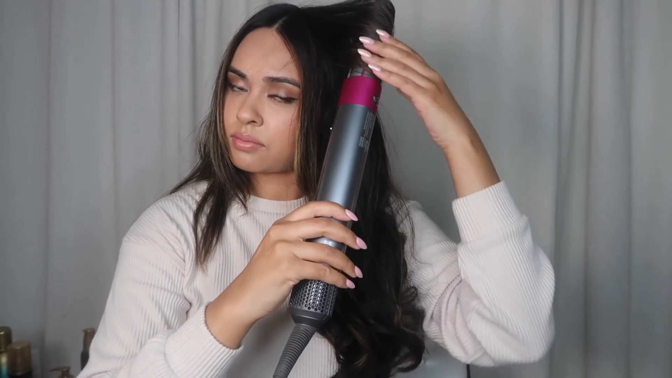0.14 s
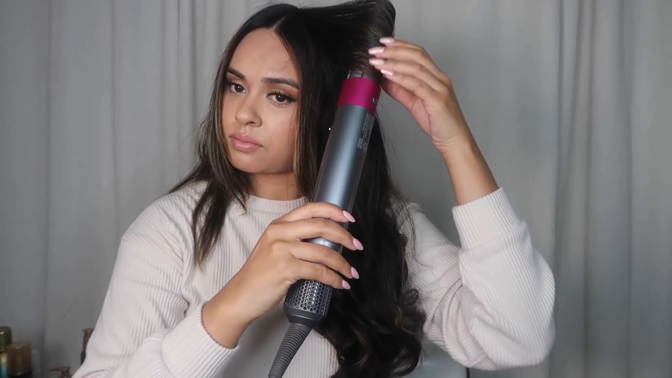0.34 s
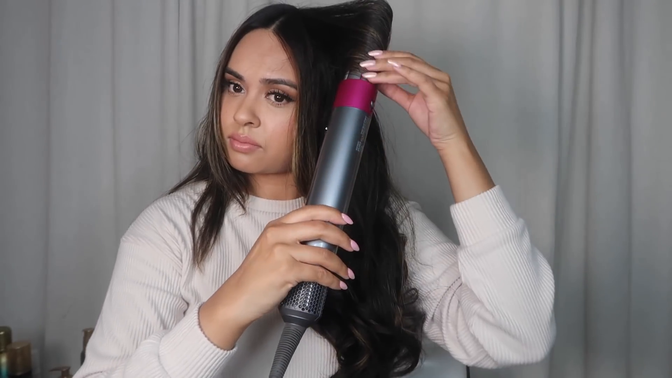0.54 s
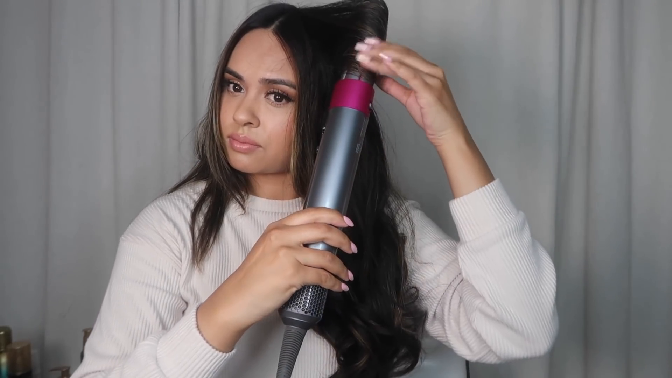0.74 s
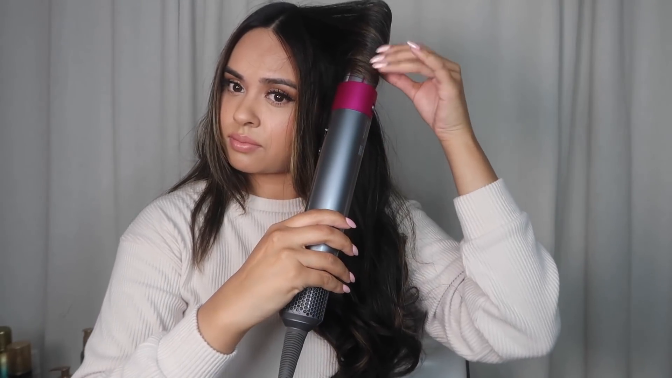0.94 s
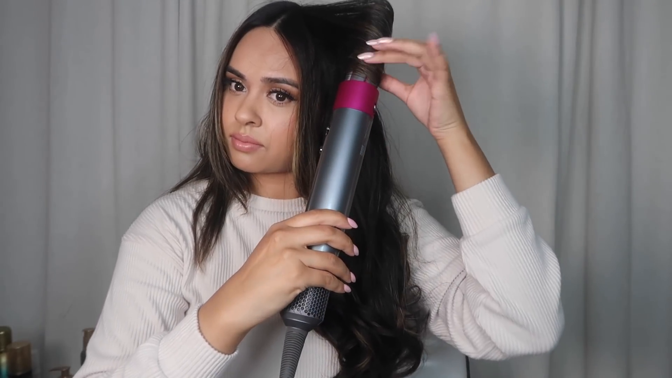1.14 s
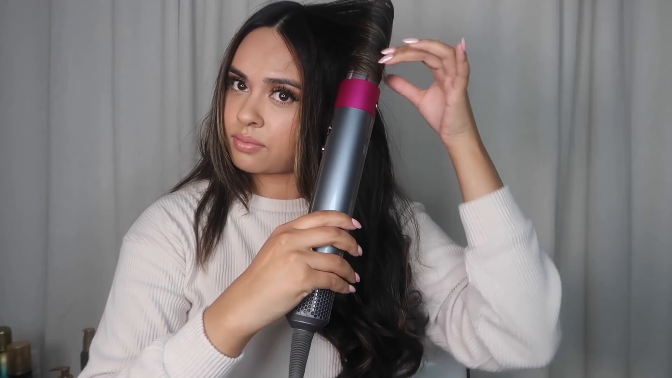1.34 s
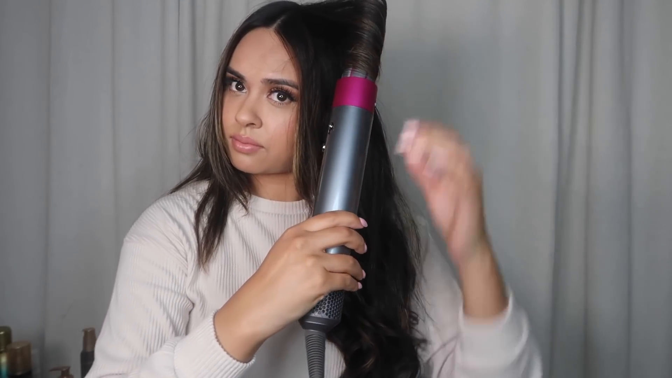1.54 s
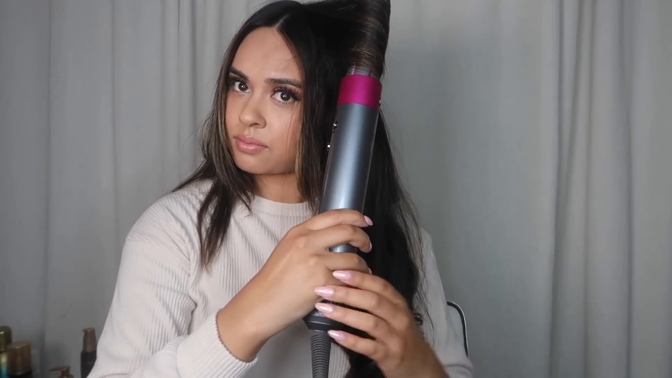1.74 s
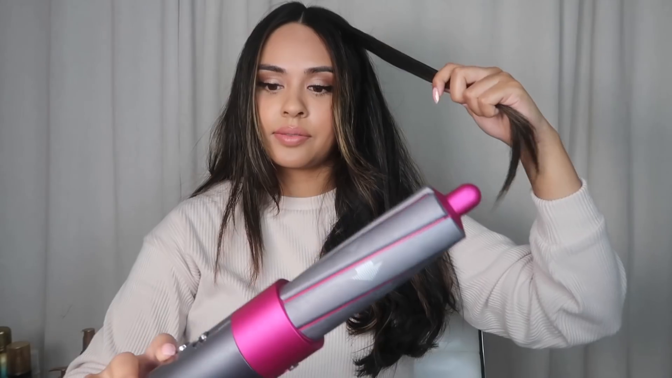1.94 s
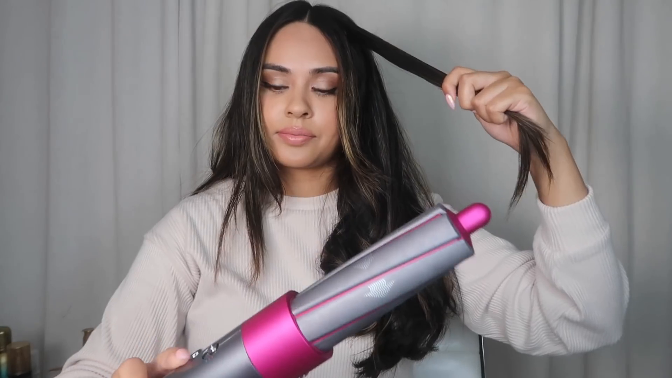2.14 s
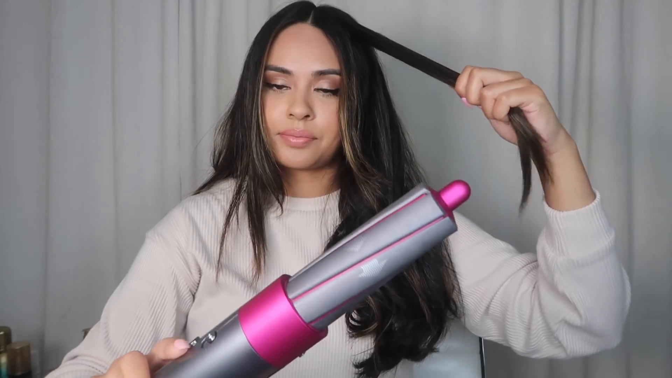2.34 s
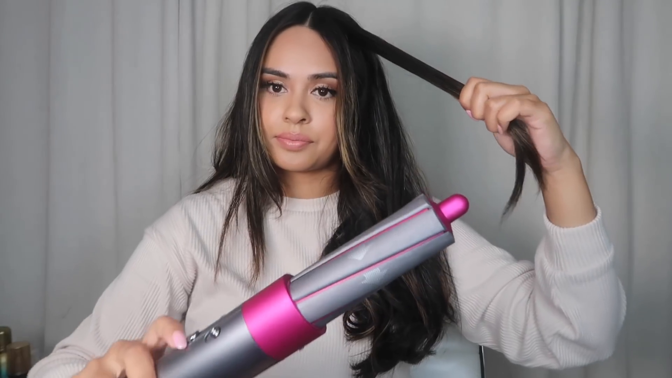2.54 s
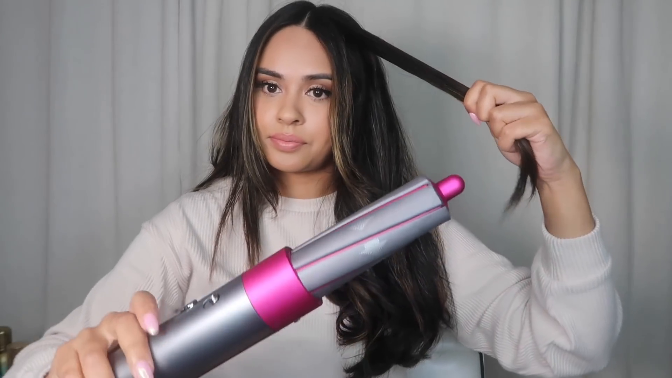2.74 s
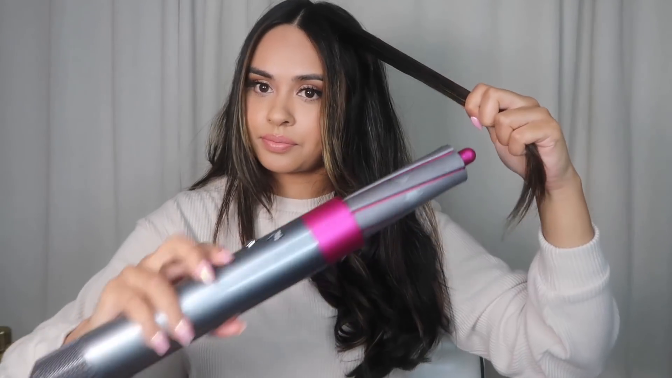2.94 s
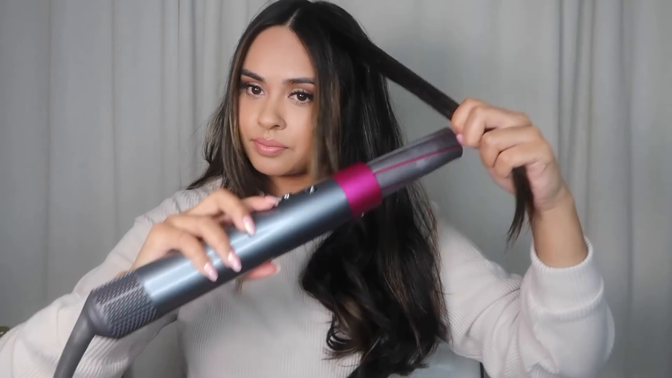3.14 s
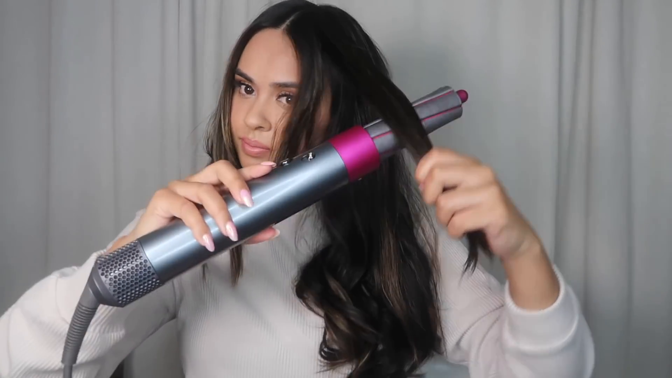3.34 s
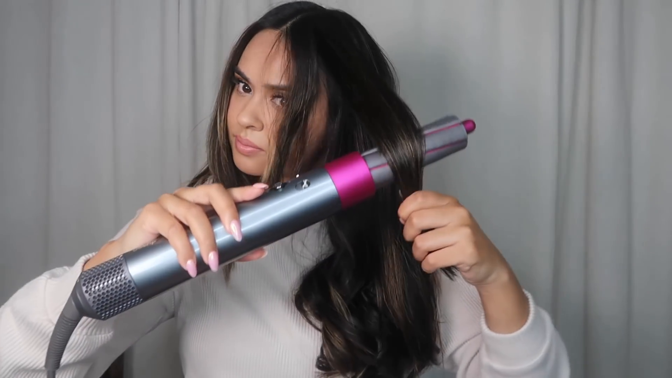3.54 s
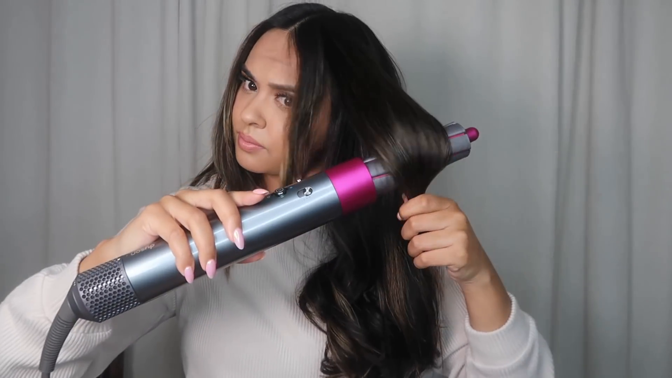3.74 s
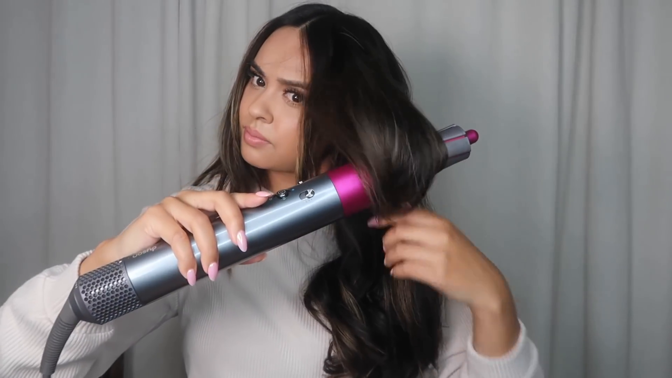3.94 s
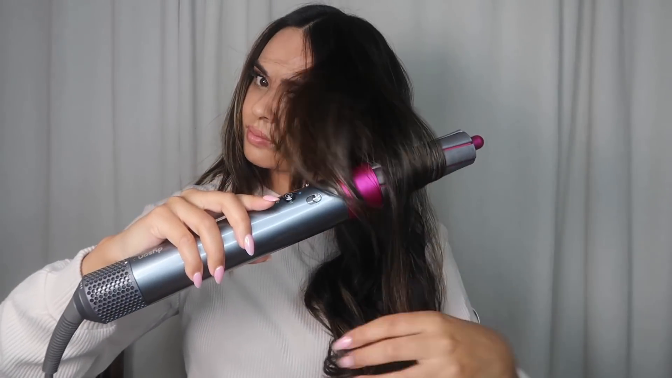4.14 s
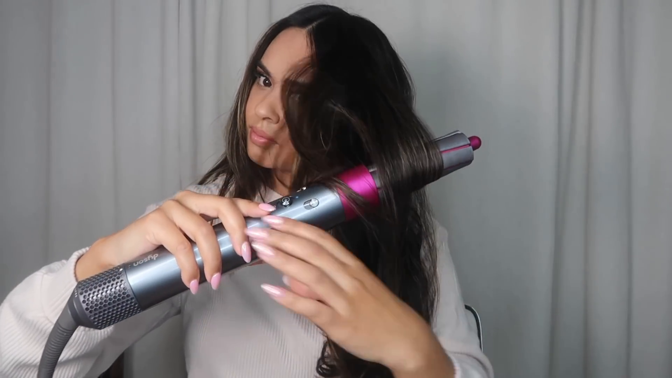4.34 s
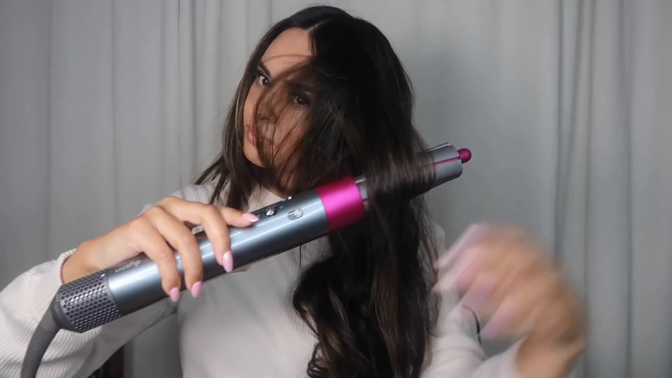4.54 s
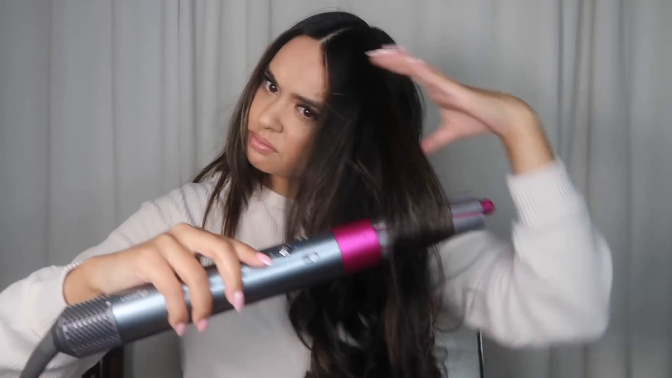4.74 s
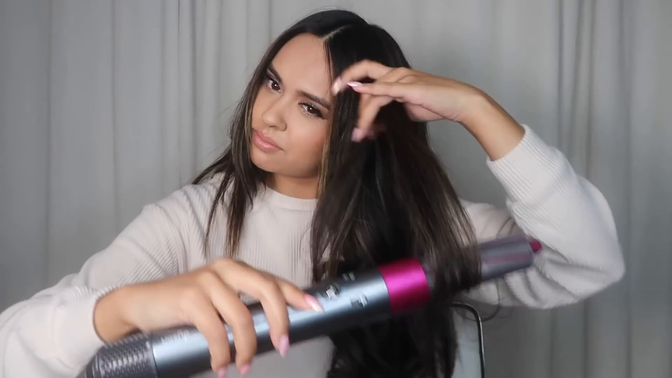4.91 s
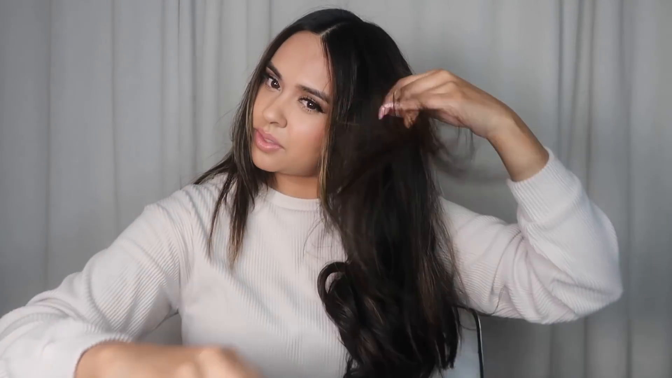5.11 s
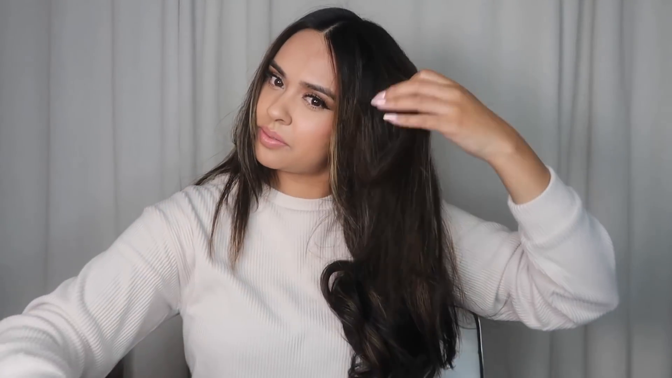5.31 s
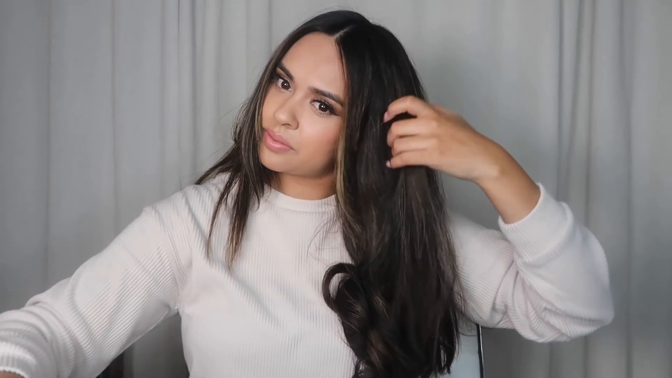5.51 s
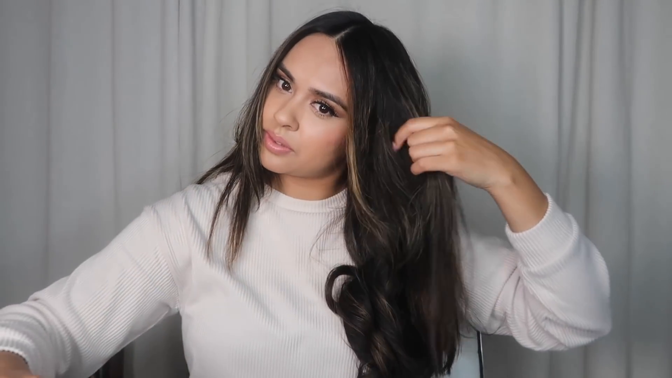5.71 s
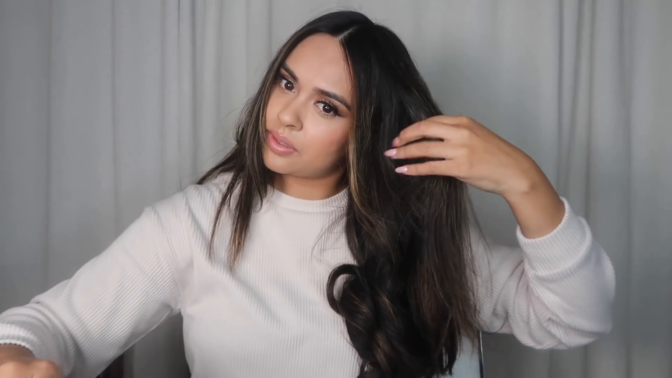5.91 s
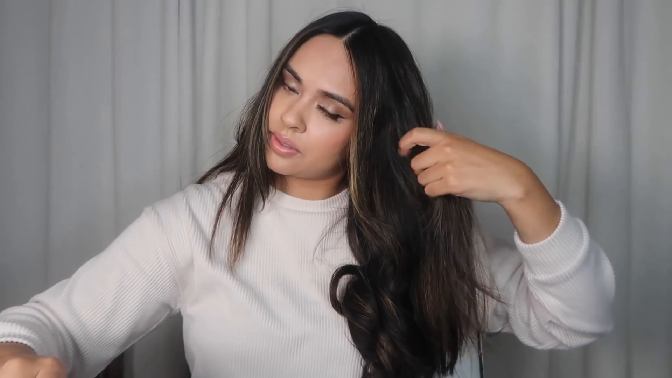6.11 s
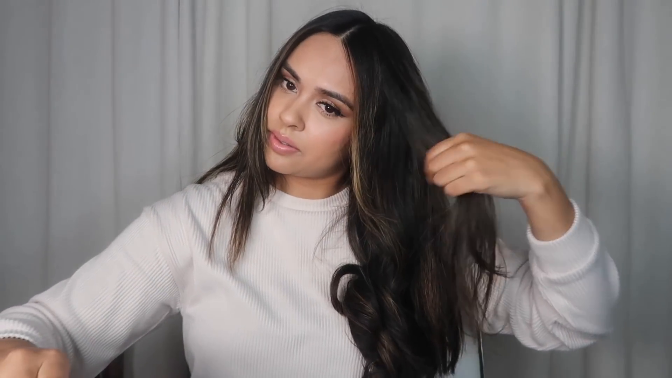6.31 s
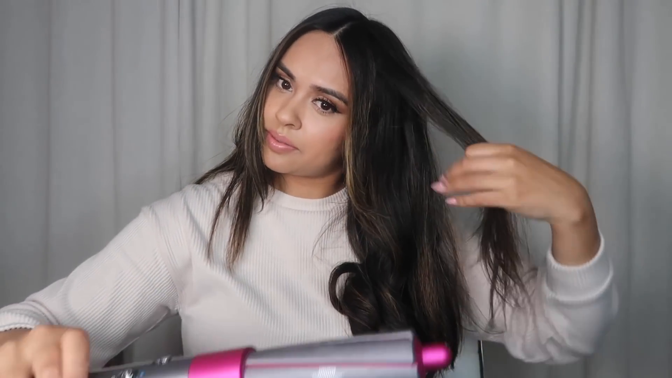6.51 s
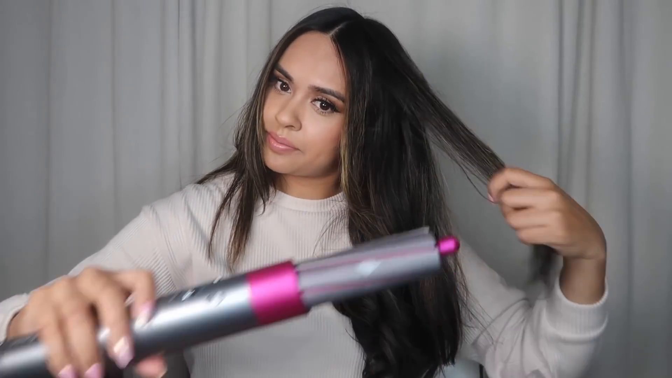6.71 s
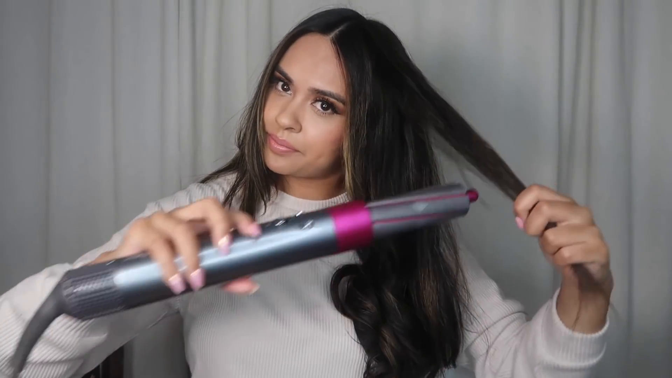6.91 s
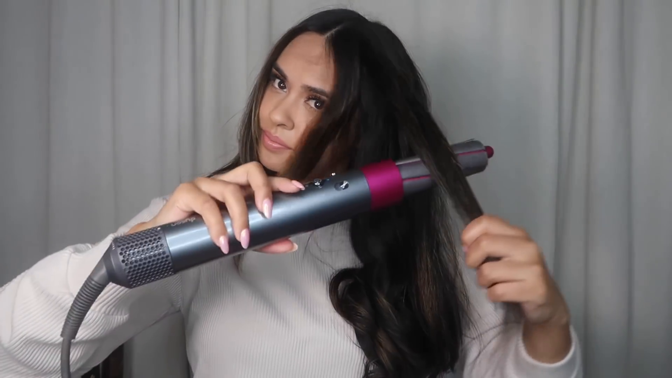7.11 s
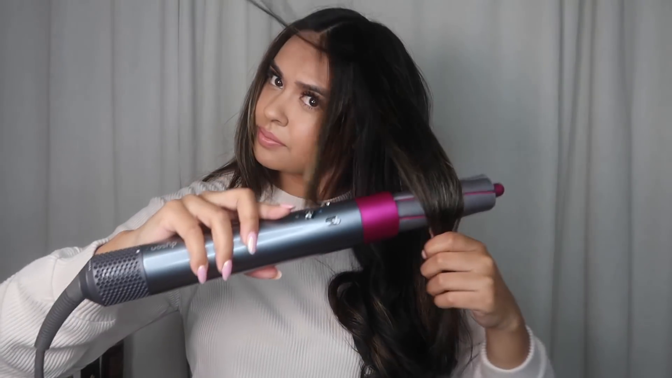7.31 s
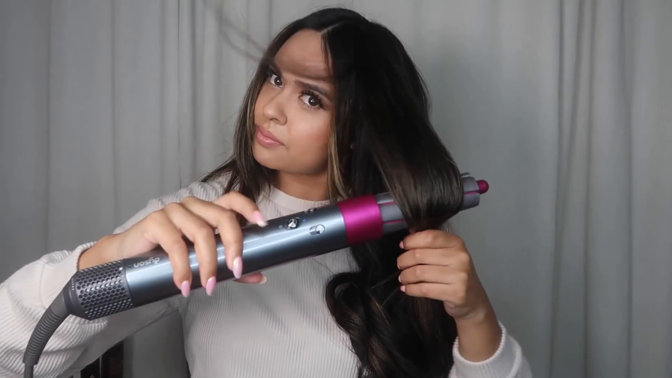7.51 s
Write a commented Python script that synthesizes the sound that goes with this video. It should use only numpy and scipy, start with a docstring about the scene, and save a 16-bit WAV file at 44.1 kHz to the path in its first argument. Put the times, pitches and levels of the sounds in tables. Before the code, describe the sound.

Close to a stereo microphone indoors, an electric hair styler rushes with steady, mid-bright air and a thin high motor whine. It cuts off abruptly, leaving a quiet room with low hum and a few crisp plastic clicks. A quick rising whistle brings the air back, now with more low buffeting, its tone and strength shifting as the tool turns and hair wraps it.

```python
"""A hand-held hair styler blows a broad rush of air: coloured noise that swells and shifts in pitch as the tool turns.
Its fast motor whines thinly: sines at the shaft speed and its multiples.
The sound is cut off, and a quiet room (noise, hum, ticking) and a few plastic clicks (ringing modes) are heard.
Then gliding tones mark the motor spinning up, and the air returns.
Two close microphone ports hear the bass alike and the treble mostly in opposite phase."""
import sys
import numpy as np
from scipy import signal
from scipy.fft import rfft, irfft
from scipy.io import wavfile
from scipy.ndimage import uniform_filter1d, map_coordinates

SR = 44100
rng = np.random.default_rng(int(sys.argv[2]) if len(sys.argv) > 2 else 0)


def file_out(sig):
    """Save sig as 16-bit WAV at sys.argv[1]."""
    # one column per channel
    cols = np.atleast_2d(sig).T
    # limit, then scale
    lim = np.clip(cols, -1, 1)
    pcm = np.round(lim * 32767).astype(np.int16)
    wavfile.write(sys.argv[1], SR, pcm)


def ratio_of_db(decibels):
    """Turn decibels (scalar or array-like) into linear amplitude factors; 0 dB maps to 1."""
    return 10 ** (np.asarray(decibels, float) / 20)


N = 333396
T = np.arange(N) / SR
FRAME = 1024  # samples in one short-time spectrum
CUT_S, CUT_FADE_S = 1.8635, 0.016  # the tool stops
START_S, START_FADE_S = 2.614, 0.012  # the tool starts again
QUIET_S = START_S - 0.3  # a moment in the pause, where settings may switch unheard


def curve(rows, at=T):
    """Columns of a table joined by straight lines in time."""
    s, *columns = np.transpose(rows)
    return [np.interp(at, s, c) for c in columns]


def level(x, db):
    """Scale to an rms level."""
    return x * ratio_of_db(db) / np.sqrt(np.mean(x ** 2))


def frames(x):
    """Short-time spectrum: (Hz, s, bins)."""
    return signal.stft(x, SR, nperseg=FRAME, noverlap=FRAME * 3 // 4)


def colour(bins, db):
    """Back to sound with a gain for each frequency and moment."""
    return signal.istft(bins * ratio_of_db(db), SR, nperseg=FRAME, noverlap=FRAME * 3 // 4)[1][:N]


def shape(points, hz):
    """A spectrum read on a log-frequency axis, as a column."""
    point_hz, point_db = np.transpose(points)
    return np.interp(np.log(hz + 1), np.log(point_hz), point_db)[:, None]


def bump(hz, centre, width):
    """A bell-shaped hill over frequency, 1 at its centre, as a column or a map."""
    return np.exp(-((hz[:, None] - centre) / width) ** 2)


def patches(hz, s, width_hz, per_second):
    """Smooth chance over frequency and time, spread near 1."""
    rows, cols = np.meshgrid(hz / width_hz, s * per_second, indexing="ij")
    return map_coordinates(rng.standard_normal((300, 200)), [rows, cols], order=1, mode="wrap") * 1.4


def tone(hz, db, wobble_hz):
    """A sine of a given rms level whose pitch trembles."""
    tremble = uniform_filter1d(rng.standard_normal(N), size=400) * 20
    return np.sqrt(2) * ratio_of_db(db) * np.sin(2 * np.pi * np.cumsum(hz + wobble_hz * tremble) / SR)


def ring(x, hz, t60):
    """One decaying mode, struck by x."""
    r, w = np.exp(-np.log(1000) / (t60 * SR)), 2 * np.pi * hz / SR
    return signal.lfilter([0, np.sin(w)], [1, -2 * r * np.cos(w), r * r], x)


def gate(t0, t1, fade):
    """1 between two times with soft edges."""
    return np.clip((T - t0) / fade + .5, 0, 1) * np.clip((t1 - T) / fade + .5, 0, 1)


def tail(t60):
    """A short noisy echo of the walls, energy 1."""
    h = rng.standard_normal(int(.2 * SR)) * np.exp(-np.log(1000) * T[:int(.2 * SR)] / t60)
    return h / np.sqrt(np.sum(h ** 2))


# The air as the tool turns and hair wraps it. Each row: time in seconds, levels of jet, buffeting and top hiss
# in dB over the usual colour, jet centre in Hz, share of direct sound from one side (0-1).
AIR_MOVES = [(0, 0.5, -7, -4, 2850, 0.23), (.8, -0.5, -8.5, -4.5, 2680, 0.22),
             (1.3, 0, -8.5, -4.5, 2690, 0.22), (1.86, -0.5, -8, -6, 2750, 0.2),
             (2.62, 1, 10.5, 0.5, 2400, 0.2), (3.42, -1, -2.5, -0.5, 2660, 0.53),
             (3.56, -0.5, -2.5, 0, 2605, 0.44), (4.2, -0.5, -6, -0.5, 2680, 0.43),
             (4.85, -0.2, -7.5, -1, 2730, 0.4), (5.1, 0, 6.5, -5.5, 2450, 0.17),
             (5.6, 1, 9.5, -3.5, 2330, 0.22), (6.3, 1.4, 12, -3, 2399, .3),
             (6.7, 0.3, 10.5, -1.5, 2440, 0.24), (7.1, -1, 9, -0.5, 2658, 0.56),
             (7.35, 1, 4.5, -0.5, 2630, 0.55), (7.56, -2.5, 2, -3, 2630, 0.3)]
# Centres of the five parts of the air, in Hz: buffeting, roar, jet, hiss and top hiss.
AIR_PARTS_HZ = (90, 800, 2700, 6500, 13500)
# Usual colour of the sum of the ports. Each row: frequency in Hz, relative density in dB per Hz.
AIR_SUM_COLOUR = [(18, -54), (30, -24.5), (141, -11), (301, -7.5), (412, -9), (579, -7), (1450, -3),
                  (2200, -2.5), (2800, -1), (3300, -2.5), (3900, -6), (4700, -11.5), (5650, -16),
                  (7340, -17), (9290, -22), (10900, -24.5), (13100, -23), (15700, -25)]
# Usual colour of the difference of the ports. Each row: frequency in Hz, relative density in dB per Hz.
AIR_DIFFERENCE_COLOUR = [(59, -56), (100, -38), (140, -37), (387, -37), (900, -20), (1410, -18),
                         (1700, -11), (2190, -4.5), (3720, 1), (5810, -2), (10700, -1.5), (13000, -2.5),
                         (14500, -9), (15700, -16)]
# The fan gathering speed. Each row: time in seconds, share of the airflow still lacking (0-1).
LACKING = [(2.612, 1), (2.645, 1), (2.67, 0.82), (2.73, 0.57), (2.77, 0.37), (2.808, 0.43), (2.822, 0.16),
           (2.93, 0.12), (3.05, 0.07)]
# What a full lack adds, in dB: to buffeting, roar, jet, hiss, top hiss and the difference of the ports.
LACKING_DB = (-28, -16.5, -19.5, -22, -38, -21)
# The slots' strongest resonance, moving as hair covers them.
# Each row: time in seconds, frequency in Hz, level in dB over the jet.
SLOT = [(0, 2690, -0.5), (1.86, 2750, 0), (2.8, 2320, 1.5), (4.3, 2230, 6), (5.05, 2170, 5.5),
        (5.3, 1970, 2.5), (5.8, 1980, 1), (6.2, 2079, 3.5), (6.7, 2093, 3.5), (7, 2350, 5.5),
        (7.56, 2220, 6.5)]
# A second, broader resonance of the slots. Each row: time in seconds, frequency in Hz, lift in dB.
UPPER_SLOT = [(0, 3520, 0), (1.86, 3500, 0.5), (2.8, 3400, 0.5), (4.6, 3260, 1), (5.1, 3401, 4),
              (5.4, 3440, -2), (5.8, 3580, 2.5), (6.4, 3500, 2), (6.9, 3400, 1.5), (7.1, 3467, 1.5),
              (7.56, 3500, 1)]
# The jet's deepest bass. Each row: time in seconds, lift in dB.
DEEP_BASS = [(0, 1), (2.6, 1), (3, 9), (3.45, 12), (3.7, -2), (4, 4), (4.9, -1), (5.3, 0), (6.3, -2),
             (7.56, -2)]


def air():
    """Turbulent jet; its parts swell as the barrel turns and hair wraps it; nearby surfaces comb it finely."""
    hz, s, near = frames(rng.standard_normal(N))
    far = frames(rng.standard_normal(N))[2]
    column = hz[:, None]
    after_cut = s > CUT_S

    jet, buffet, top, centre_hz, direct = curve(AIR_MOVES, s)
    before = s < QUIET_S
    # dB before and after the pause; rush is the difference of the ports
    roar, hiss, rush = np.where(before, 0.1, 0.3), np.where(before, -0.5, 0), np.where(before, -4, 0.6)
    lack = np.clip(curve(LACKING, s)[0], 0, 1) * (s > QUIET_S)
    top_lack = lack ** 2.6  # the top hiss recovers sooner
    lacks = np.array([lack, lack, lack, lack, top_lack, lack])
    *parts, rush = np.array([buffet, roar, jet, hiss, top, rush]) + np.array(LACKING_DB)[:, None] * lacks
    # blend the parts smoothly over frequency
    place = np.interp(np.log(hz + 1), np.log(AIR_PARTS_HZ), np.arange(len(parts)))
    where = np.meshgrid(place, np.arange(len(s)), indexing="ij")
    swell = map_coordinates(np.array(parts), where, order=1)

    # the hump leans up or down as the slots face toward or away
    octaves = np.log2(hz / 2500 + 1e-3)[:, None]
    swell += 35 * np.log2(centre_hz / 2500) * octaves * np.exp(-octaves ** 2)
    slot_hz, slot_db = curve(SLOT, s)
    swell += slot_db / (1 + ((column - slot_hz) / 250) ** 2)
    upper_hz, upper_db = curve(UPPER_SLOT, s)
    swell += upper_db * bump(hz, upper_hz, 650)
    swell += curve(DEEP_BASS, s)[0] / (1 + (column / 130) ** 4)

    def comb():
        fine = np.clip(column / 1000, .3, 1.1) * patches(hz, s, 80, .8)
        return fine + .2 * patches(hz, s, 900, 1.2) + .6 * patches(hz, s, 2500, 12)

    sum_comb, difference_comb = comb(), comb()
    # standing waves of the room
    swell += 1.8 * np.clip(1.5 - column / 1000, 0, 1) * patches(hz, s, 45, .3) * after_cut
    swell += 0.51 * bump(hz, 4050, 350) * after_cut  # a shoulder at the top of the hump
    # sound from one side cancels in the sum where the ports lie half a wave apart
    swell -= 20 * np.clip(direct, 0, 1) * bump(hz, 11000, 1300)

    sum_db = shape(AIR_SUM_COLOUR, hz)
    jet_band = (hz > 1800) & (hz < 4200)
    # the usual colour is set to -24 dB within the jet band
    unit_db = -24 - 10 * np.log10(np.sum(ratio_of_db(sum_db[jet_band]) ** 2) * 2 / FRAME)
    # direct sound from one side reaches one port first: about a quarter turn of phase in the difference
    direct = np.clip(direct, 0, .95) * np.clip(np.cos(column / 11000 * np.pi / 2) * 2, -1, 1)
    difference = np.exp(1.3j) * direct * near + np.sqrt(1 - direct ** 2) * far
    # the slow fan has little treble yet
    dull = 9 * np.clip((2.8 - s) / 0.52, 0, 1) * after_cut * np.clip(octaves, 0, 2)
    half_wave = 5 * direct[0] * bump(hz, 10800, 1200)  # the difference is strongest at half a wave
    difference_db = shape(AIR_DIFFERENCE_COLOUR, hz) - 13.5 + rush - dull + half_wave
    mid = standing(colour(near, unit_db + sum_db + swell + sum_comb))
    side = colour(difference, unit_db + difference_db + difference_comb)
    return np.array([mid, side])


# Standing waves of the room where the tool is first held. Each row: frequency in Hz, rough width in Hz, lift in dB.
STANDING = [(149, 20, 5), (216, 30, 6.5), (301, 32, 6.5), (374, 32, 9.5), (452, 36, 5), (516, 44, 5.5),
            (582, 30, 7), (712, 32, 6), (777, 22, 8), (874, 43, 6), (1013, 15, 8), (1078, 40, 6.5),
            (1170, 48, 4.5), (1350, 200, 2.5), (2040, 51, 4.5), (2330, 70, 2), (2770, 60, 4), (2920, 90, 2),
            (3460, 60, 1), (3550, 100, 3), (3800, 120, -1.5), (4130, 60, 3.5)]


def standing(x):
    """Until the pause the room's standing waves comb the jet; in the bass the valleys between them sink."""
    hz = np.arange(N // 2 + 1) * SR / N
    valleys = -4.5 / (1 + (hz / 1190) ** 8)
    peaks = sum(db * np.exp(-((hz - centre) / width * 1.88) ** 2) for centre, width, db in STANDING)
    return np.where(T < QUIET_S, irfft(rfft(x) * ratio_of_db(valleys + peaks), N), x)


# Speed of the motor shaft. Each row: time in seconds, turns per second in Hz.
SHAFT_SPEED = [(0, 1802), (1.87, 1802), (3, 1810), (3.28, 1849), (3.7, 1850), (4.2, 1805), (7.56, 1805)]
# The whine as the tool points about, before its flicker.
# Each row: time in seconds, level of the unbalance (shaft) tone in dB, level of the fourth multiple in dB.
WHINE = [(0, -42, -40.5), (1, -42, -43), (1.87, -40, -41.5), (3, -60, -62), (3.15, -41, -46),
         (3.7, -37, -48), (4, -59, -70), (4.2, -39, -43), (4.85, -40, -53), (5.2, -34.5, -48),
         (5.8, -36.5, -48.5), (6.3, -38, -50), (6.8, -40, -50), (7, -41.5, -47), (7.3, -39.5, -61),
         (7.56, -37, -56)]


def motor():
    """Shaft tone and its second, fourth and eighth multiples; after the start it overshoots and settles."""
    hz, = curve(SHAFT_SPEED)
    first_db, fourth_db = curve(WHINE)
    before = T < CUT_S + CUT_FADE_S
    flicker_db = 3 * patches(np.zeros(1), T, 1, 10)[0]
    fourth_db = fourth_db + flicker_db * (T > CUT_S + CUT_FADE_S)
    runs = before | (T > 2.7)  # the whine is back a little after the air
    low = tone(hz, first_db, 3.27)
    high = tone(4 * hz, fourth_db, 4.2) + tone(8 * hz, fourth_db - 22, 8)
    high += tone(4 * hz - 334, fourth_db - 8, 4)  # a side tone just under the fourth multiple
    second = tone(2 * hz, first_db - 17, 3)  # heard only in the difference of the ports
    # the whine swings off centre as the tool moves
    aside = np.interp(T, [1.9, 3, 3.8, 4.2], [.3, 1.4, 1.4, .7])
    return runs * np.array([low + high, 0.17 * low + aside * np.roll(high, 2) + second])


# Glides of the start. Each row: time in seconds, frequency in Hz, level in dB (in the sum of the ports, before echo).
# The shaft gathering speed, columns as above.
SPIN_SHAFT = [(2.645, 270, -62), (2.665, 350, -43), (2.7, 490, -40), (2.715, 540, -39), (2.727, 562, -34),
              (2.735, 570, -37), (2.741, 575, -62)]
# The rising blade whistle, columns as above.
SPIN_WHISTLE = [(2.612, 650, -48), (2.62, 800, -39), (2.63, 1020, -38), (2.645, 1450, -34),
                (2.66, 1950, -35), (2.68, 2600, -38), (2.7, 3000, -38), (2.72, 3450, -38),
                (2.731, 3780, -34), (2.738, 4000, -42), (2.762, 4850, -44), (2.79, 5000, -50)]
# The steady whine of the drive electronics, columns as above.
SPIN_DRIVE = [(2.6, 9250, -70), (2.625, 9250, -45), (2.66, 9250, -52), (2.75, 9250, -49), (2.82, 9250, -52),
              (2.86, 9250, -66)]
# A companion below the blade whistle, columns as above.
WHISTLE_STRAND = [(2.63, 900, -46), (2.645, 1230, -37), (2.66, 1620, -35), (2.672, 1950, -37),
                  (2.685, 2250, -48)]
# A short falling whistle as the flow catches, columns as above.
SPIN_SIGH = [(2.785, 3750, -46), (2.805, 3600, -39), (2.825, 2900, -37), (2.845, 2400, -42)]
# Fizz as the drive wakes. One row: start in seconds, end in seconds, centre in Hz, width in Hz,
# level in dB (in the difference of the ports).
DRIVE_BURST = (2.612, 2.65, 9400, 900, -46)


def spin_up():
    """Gliding shaft and blade tones and a short steady whine while the motor gathers speed."""
    def glide(rows, wobble_hz):
        return tone(*curve(rows), wobble_hz) * gate(rows[0][0], rows[-1][0], 0.0055)

    shaft, drive = glide(SPIN_SHAFT, 8), glide(SPIN_DRIVE, 25)
    third_multiple = np.array(SPIN_SHAFT) * (1, 3, 1) + (0, 0, -11)  # 11 dB weaker
    shaft = shaft + glide(third_multiple, 40)
    whistle = glide(SPIN_WHISTLE, 45) + glide(WHISTLE_STRAND, 60) + glide(SPIN_SIGH, 45)
    whistle = whistle + ratio_of_db(-9) * signal.fftconvolve(whistle, tail(.1))[:N]

    t0, t1, hz, width_hz, db = DRIVE_BURST

    def fizz():
        noise = ring(ring(rng.standard_normal(N), hz, 2 / width_hz), hz, 2 / width_hz)
        return level(noise, db) * gate(t0, t1, 0.015)

    mid = shaft + whistle + drive + 0.66 * fizz()
    side = 0.077 * np.roll(whistle, 3) + np.roll(drive, 1) + fizz()
    return np.array([mid, side])


# Nails and switch on the plastic barrel. Each row: start in seconds, peak in dB before echo and filter,
# crack centre in Hz, crack length in cycles, gain of the barrel's ring in dB, share of bright edge.
CLICKS = [(2.129, -48, 2200, 4, -20, .1), (2.2051, -35, 5500, 5, -18, .3), (2.206, -24.5, 3000, 8, -18, .3),
          (2.217, -44, 7500, 12, -6, .1), (2.228, -43, 2800, 5, -10, .2),
          (2.451, -30.5, 2300, 3.5, -26, .08), (2.5885, -37, 3600, 4, -24, .1)]
# Modes of the plastic barrel. Each row: frequency in Hz, relative gain in dB, time to fade by 60 dB in seconds.
BARREL = [(1420, 3, .022), (1970, 3, 0.03), (2860, -5, .03), (3140, -7, .045), (5300, -13, 0.073),
          (5430, -8, 0.2), (7200, -11, .02), (9500, -13, .025)]


def clicks():
    """Each tap is a sharp crack plus a little of the barrel's modes; the walls add a short tail."""
    dry = np.zeros(N)
    t = np.arange(int(.2 * SR)) / SR
    for s, db, hz, cycles, ring_db, edge in CLICKS:
        blow = (t == 0) + 0.08 * rng.standard_normal(len(t)) * np.exp(-t / 0.0005)
        crack = np.diff(ring(ring(blow, hz, cycles / hz), hz, cycles / hz / 2), prepend=0)
        bright_edge = edge * ring(blow, 7900, 0.0016)
        barrel = sum(ratio_of_db(gain) * ring(blow, mode_hz, t60) for mode_hz, gain, t60 in BARREL)
        tap = crack / np.max(np.abs(crack)) + bright_edge + ratio_of_db(ring_db) * barrel
        dry[int(s * SR):][:len(t)] += ratio_of_db(db) * tap / np.max(np.abs(tap))

    def echo():
        wet = signal.fftconvolve(dry, ratio_of_db(-4.5) * tail(0.13))[:N]
        return np.roll(wet, int(.002 * SR))  # the first echo comes 2 ms later

    soften = signal.butter(4, 10500, fs=SR, output="sos")
    mid = signal.sosfilt(soften, dry + echo())
    side = 1.6 * np.diff(.2 * dry + echo(), prepend=0)  # brighter in the difference of the ports
    return np.array([mid, side])


# Room noise in the sum of the ports. Each row: frequency in Hz, relative density in dB per Hz.
ROOM_SUM_COLOUR = [(15, -34), (25, -33), (96, -4.5), (145, -5.5), (300, -8.5), (385, -5), (490, -12.5),
                   (599, -13.5), (3630, -24.5), (8690, -36.5), (10500, -38), (12900, -52), (14000, -66)]
# Room noise in the difference of the ports. Each row: frequency in Hz, relative density in dB per Hz.
ROOM_DIFFERENCE_COLOUR = [(50, -39), (150, -20), (400, -13), (1000, -18), (3000, -25), (6000, -31),
                          (10000, -38), (14000, -44)]
# Hum of a machine elsewhere in the house. Each row: frequency in Hz, level in dB.
HUM = [(28.4, -63), (59.9, -63), (91.4, -59.5), (120, -60.5)]


def room():
    """Rumble and hum of the house, a thin high tone and a faint uneven ticking right at the microphone."""
    hz, s, sum_bins = frames(rng.standard_normal(N))
    difference_bins = frames(rng.standard_normal(N))[2]
    uneven_db = 0.93 * patches(hz, s, 280, 7.55)
    rumble = level(colour(sum_bins, shape(ROOM_SUM_COLOUR, hz) + uneven_db), -53.5)
    side = level(colour(difference_bins, shape(ROOM_DIFFERENCE_COLOUR, hz)), -57.5)

    # about 56 ticks a second, uneven in time and strength
    timing, strength = rng.standard_normal((int(N / SR * 80), 2)).T
    at = ((np.arange(len(timing)) + 0.2 * timing) / 56 * SR).astype(int)
    kicks = np.bincount(np.clip(at, 0, N), ratio_of_db(3.6 * strength), N + 1)[:N]
    ticks = level(ring(ring(kicks, 4050, .005), 4050, .005), -61)

    hum_on = gate(-1, 3.5, .1)  # the machine switches off
    rumble = rumble * ratio_of_db(1 - hum_on)  # the rumble is 1 dB stronger once the hum is gone
    hum = hum_on * sum(tone(hum_hz, db, 2.75) for hum_hz, db in HUM)
    thin = tone(13006, -82, 1)
    return np.array([rumble + hum + thin + 0.16 * ticks, side + ticks + np.roll(thin, 1)])


def scene():
    """Sum and difference of the two ports, turned into left and right."""
    blowing = gate(-1, CUT_S, CUT_FADE_S) + gate(START_S, 10, START_FADE_S)
    no_rumble = signal.butter(2, 55, "high", fs=SR, output="sos")
    tool = blowing * (signal.sosfilt(no_rumble, air()) + motor())
    mid, side = tool + spin_up() + clicks() + room()
    return np.array([mid + side, mid - side])


def low_pass(x):
    """Removes everything above the highest recorded frequency."""
    return signal.sosfilt(signal.butter(12, 15730, fs=SR, output="sos"), x)


def record(dry):
    """The finished stereo mix as it is stored."""
    return low_pass(dry)


dry = scene()
out = record(dry)
file_out(out)
```